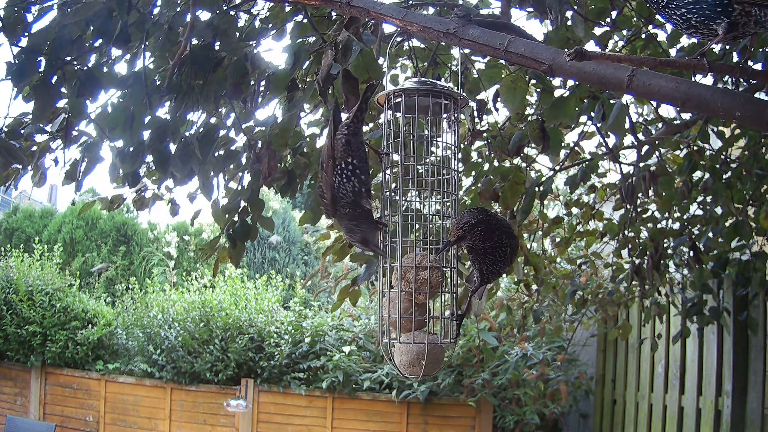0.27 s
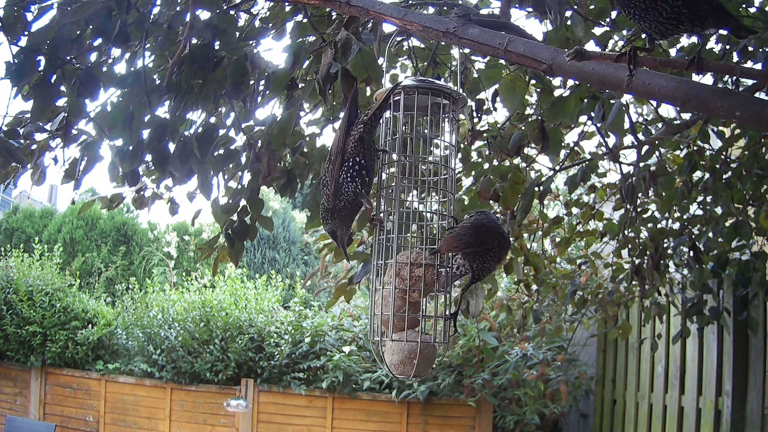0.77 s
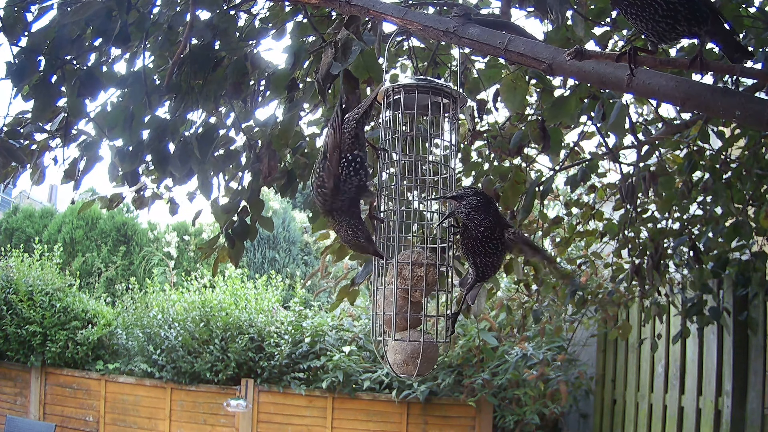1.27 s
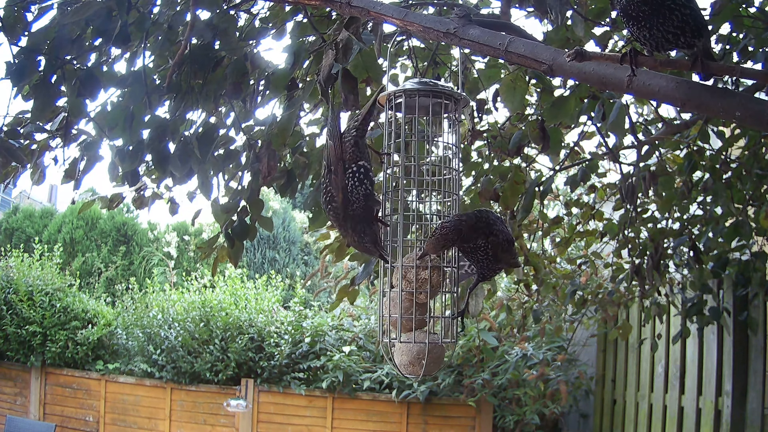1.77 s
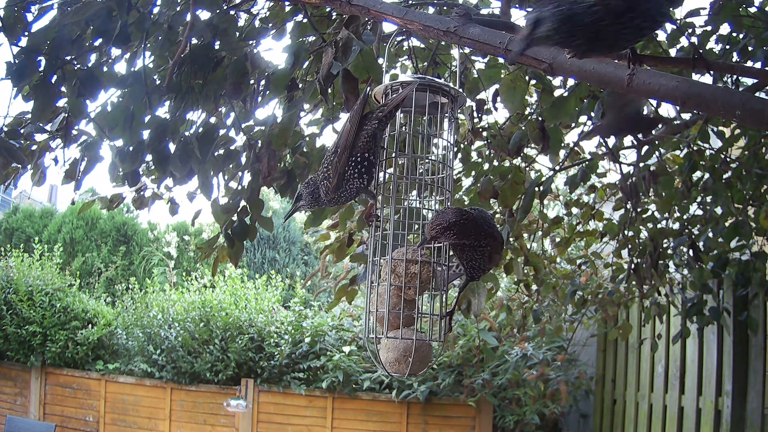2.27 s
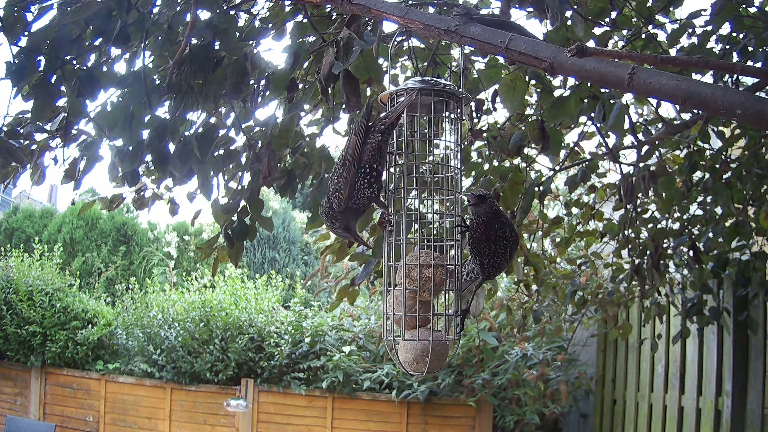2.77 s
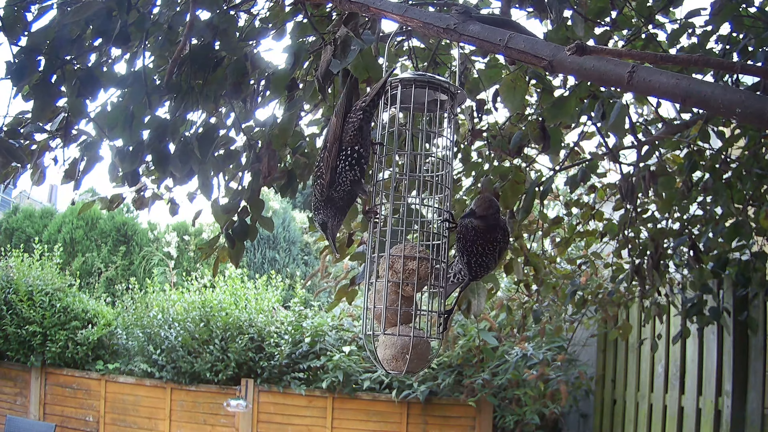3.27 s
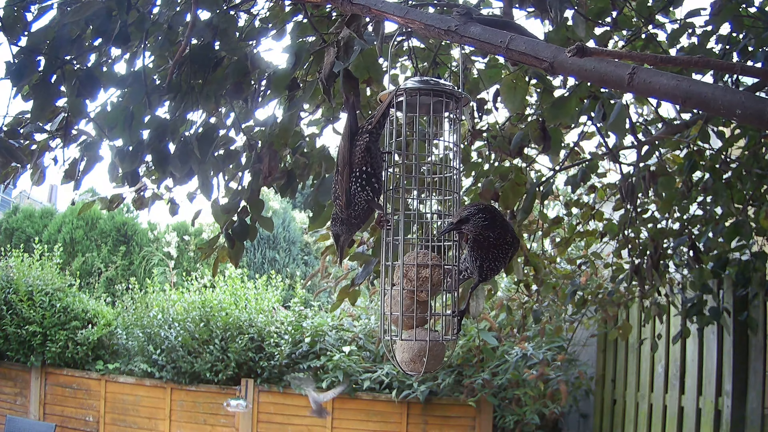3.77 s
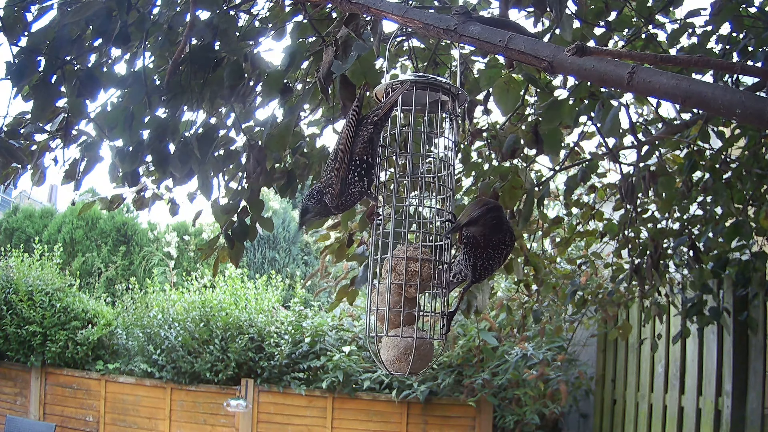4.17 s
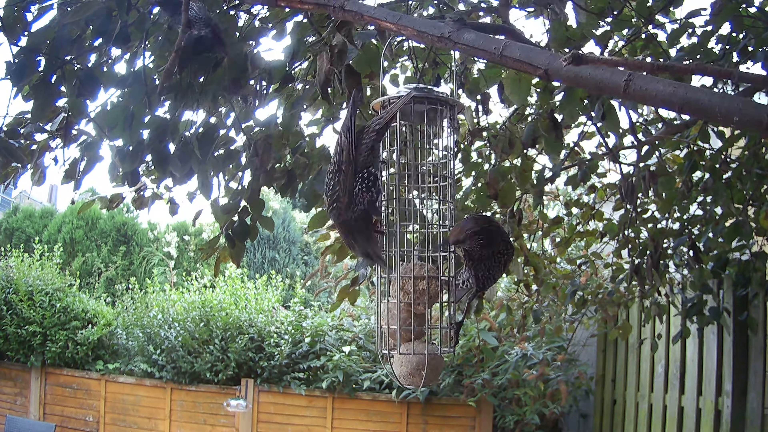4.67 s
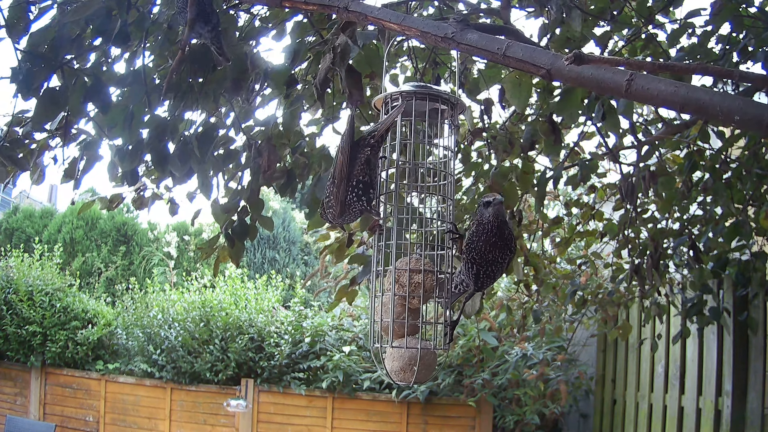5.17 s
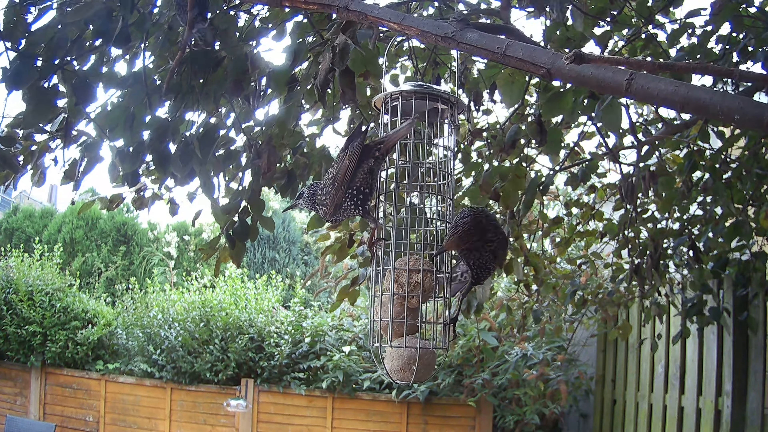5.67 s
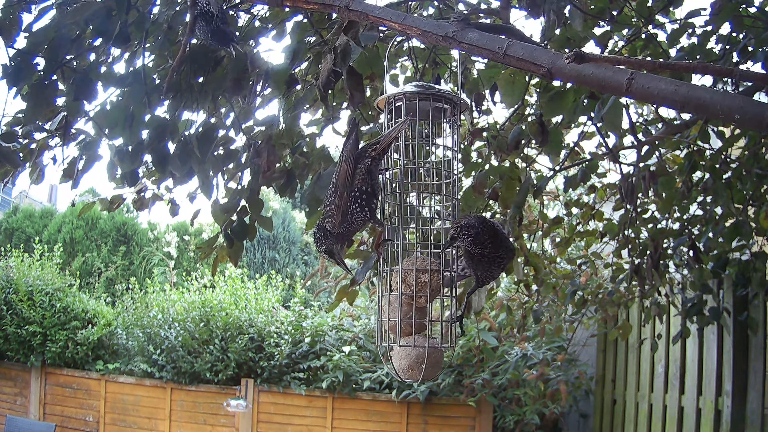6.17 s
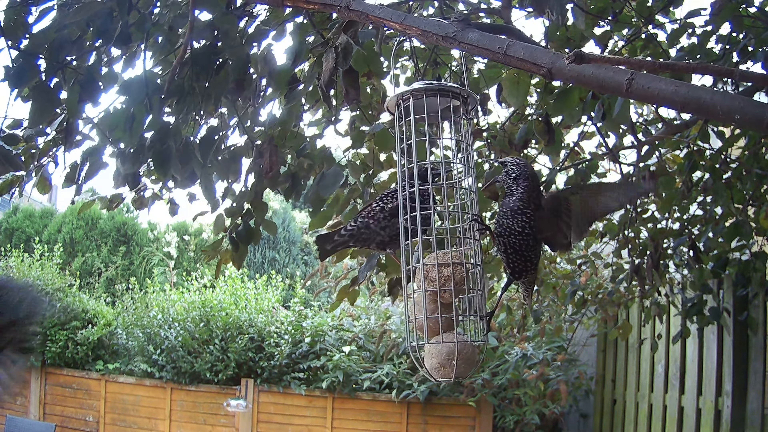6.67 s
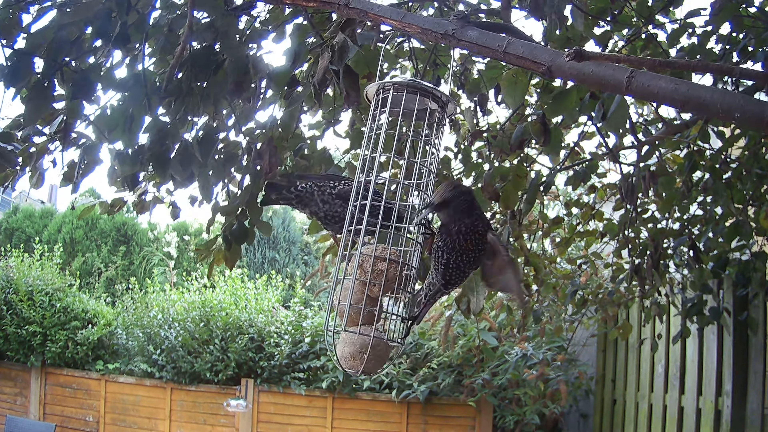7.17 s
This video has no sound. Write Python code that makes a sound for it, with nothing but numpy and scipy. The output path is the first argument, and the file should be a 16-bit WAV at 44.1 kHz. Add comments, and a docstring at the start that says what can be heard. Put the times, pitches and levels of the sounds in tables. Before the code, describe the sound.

A close outdoor microphone hears starlings at a wire feeder over uneven hiss, faint hum and crackling leaves and claws. A bright trilled squawk starts immediately, with a tick on the cage. From 0.5 to 1.0 seconds come rapid scratchy squawks and knocks, then piercing whistled screams until about 1.5, some tumbling downward in steps. It quietens, with faint distant squawks near 1.8 and 2.4. Soft wingbeats flutter from 2.5 to 3.2, followed by hollow knocks, light pecks and rustling. A distant squawk comes at 4.0 and a weak falling whistle at 4.3. Lower raspy squawks mutter from 5.1 to 5.6. Around 6.1 the quarrel erupts: harsh rapid squawks, a strong burst of scratching near 6.3, flapping wings and shrill screams lasting to about 7.1. A low squawk, a sharp cage tick and a last clipped cry end it. Short garden reflections trail the calls.

```python
"""Starlings squabbling at a wire feeder

Each side of a bird's syrinx is one oscillator: thin whistling screams that tumble down in steps, softer
undertones, and trilled squawks that break into rasp; more squawks and faint tones come from further off.
Noise bursts tick on the cage as beaks and claws, wings flap, and soft hollow knocks ring in low resonances.
Fences echo the birds over a broadband hiss that rises and falls, a low electrical hum and crackle."""
import sys
import numpy as np
from scipy import signal
from scipy.fft import rfft, irfft, next_fast_len
from scipy.io import wavfile
from scipy.ndimage import uniform_filter1d, minimum_filter1d, map_coordinates

SR = 44100
rng = np.random.default_rng(int(sys.argv[2]) if len(sys.argv) > 2 else 0)


def transcribe(signal):
    """Save signal, clipped to [-1, 1], as a 16-bit WAV file at the path in sys.argv[1]."""
    frames = np.atleast_2d(signal).T
    limited = np.clip(frames, -1, 1)
    pcm = np.round(limited * 32767).astype(np.int16)
    wavfile.write(sys.argv[1], SR, pcm)


N = 327663
TIME = np.arange(N) / SR

# air hiss spectrum of a raspy voice: f/Hz, relative level/dB
RASP_SPECTRUM = [(500, -24.5), (1200, -14), (2500, -11), (4000, -2), (6300, -1), (9000, -10.5),
                 (10300, -16.5), (15000, -21)]
# spectrum of brushing feathers and scratching claws: f/Hz, relative level/dB
SCRATCH_SPECTRUM = [(600, -12), (1800, -1.5), (4500, 4), (8000, -2), (11000, -2), (15000, 3)]

ARCH_BEND = 1.7  # exponent of a note's pitch arch


def undb(db):
    """Decibels to gain."""
    return 10 ** (np.asarray(db) / 20)


def unit(x):
    """Scale to rms 1."""
    return x / np.sqrt(np.mean(x ** 2) + 1e-18)


def colour(x, points):
    """Filter by a spectrum of (f/Hz, gain/dB) points, interpolated over log frequency."""
    hz, db = np.transpose(points)
    size = next_fast_len(len(x))
    f = np.maximum(np.fft.rfftfreq(size, 1 / SR), 1)
    gain = undb(np.interp(np.log(f), np.log(hz), db))
    return irfft(rfft(x, size) * gain, size)[:len(x)]


def noise(size, points):
    """Noise of a given colour, rms 1."""
    return unit(colour(rng.standard_normal(size), points))


def wander(t, rate_hz):
    """Smooth random curve through rate_hz normal draws (spread 1) a second."""
    steps = (t - t[0]) * rate_hz
    return map_coordinates(rng.standard_normal(2 ** 15), [steps], order=3, mode="mirror")


def breakpoints(points):
    """Level over the scene from (t/s, level/dB) points, in dB."""
    return np.interp(TIME, *np.transpose(points))


def add(out, start_s, x):
    """Mix x into out from a start time."""
    i = int(start_s * SR)
    out[i:i + len(x)] += x[:max(N - i, 0)]


def ringing(pulses, decay_s):
    """Give every pulse an exponential decay."""
    return signal.lfilter([1], [1, -np.exp(-1 / (decay_s * SR))], pulses)


def swells(table):
    """Sum of bell-shaped envelopes: centre/s, level/dB, standard deviation/s."""
    return sum(undb(db) * np.exp(-((TIME - s) / width_s) ** 2 / 2) for s, db, width_s in table)


def membrane(hz, second_db, third_db):
    """Oscillator: nearly a sine, with second and third harmonics muted above Nyquist."""
    phase = 2 * np.pi * np.cumsum(hz) / SR
    wave = np.sin(phase)
    for k, db in ((2, second_db), (3, third_db)):
        wave = wave + undb(db) * np.sin(k * phase) * (k * hz < SR / 2)
    return np.sqrt(2) * wave


def span(length_s, edge_s=.002):
    """Time axis and soft on-off gate of one note."""
    t = np.arange(0, length_s, 1 / SR)
    edge = np.clip(np.minimum(t, t[-1] - t) / edge_s, 0, 1)
    return t, np.sin(np.pi / 2 * edge) ** 2


def note(start_s, length_s, first_hz, top_hz, top_s, last_hz, db, attack_s, fade_db, fall_bend=ARCH_BEND):
    """The pitch bends to its turning point and away; the level swells in the attack, then fades."""
    onset_db, fade_bend = 14, 1.8
    t, gate = span(length_s)
    before = np.clip(1 - t / top_s, 0, 1)
    after = np.clip((t - top_s) / max(length_s - top_s, .001), 0, 1)
    hz = top_hz + (first_hz - top_hz) * before ** ARCH_BEND + (last_hz - top_hz) * after ** fall_bend
    swell = np.clip(1 - t / attack_s, 0, 1)
    fade = np.clip((t - attack_s) / max(length_s - attack_s, .001), 0, 1)
    return t, hz, gate * undb(db - onset_db * swell - fade_db * fade ** fade_bend)


def background():
    """Broadband hiss that rises and falls, a low wavering electrical hum, and crackle of claws and leaves."""
    # hiss spectrum: f/Hz, relative level/dB
    background_spectrum = [(15, -31.5), (25, 3), (81, -5.5), (207, -9), (278, -7), (373, -12.5), (529, -10),
                           (588, -14.5), (691, -14), (1120, -15.5), (2300, -25.5), (3010, -24.5),
                           (6720, -27), (15000, -41)]
    # hiss: t/s, relative level/dB
    background_levels = [(0.0, -51), (0.43, -61.5), (0.95, -52.5), (1.43, -53.5), (1.68, -63), (2.44, -68),
                         (2.73, -59), (4.61, -59.5), (5.09, -65), (5.36, -53), (6.04, -64.5), (6.27, -51),
                         (6.95, -49.5), (7.43, -56.5)]
    # electrical hum: t/s, level/dB
    mains_levels = [(0, -66), (2, -63), (4.3, -57), (4.7, -51.5), (7.43, -54.5)]
    # scratching of claws and leaves: t/s, level/dB
    rustle_levels = [(0, -52.5), (1.7, -69), (2.3, -60.5), (2.7, -55.5), (3.3, -53), (3.85, -50),
                     (4.1, -64.5), (4.6, -48), (5.1, -69.5), (5.8, -61.5), (6.3, -28), (7.43, -55)]
    hiss_gain_db, mains_hz = 8, 59
    grains_per_s, grain_spread_db, grain_decay_s = 160, 8, .0088

    hiss_db = breakpoints(background_levels) + hiss_gain_db + 1.4 * wander(TIME, 6.8)
    hiss = noise(N, background_spectrum) * undb(hiss_db)

    mains_db = breakpoints(mains_levels) + 1.4 * wander(TIME, 10)
    mains = membrane(mains_hz * (1 + .048 * wander(TIME, 4.3)), -18.5, -17) * undb(mains_db)

    grain_gain = undb(grain_spread_db * np.clip(rng.standard_normal(N), -2, 2))
    grains = (rng.random(N) < grains_per_s / SR) * grain_gain
    bursts = unit(ringing(grains, grain_decay_s))
    # the constant keeps a steady scratch under the bursts
    crackle = unit(colour((bursts + .71) * rng.standard_normal(N), SCRATCH_SPECTRUM))
    return hiss + mains + crackle * undb(breakpoints(rustle_levels))


def trill(t, rate_hz):
    """Uneven trill: its phase and its swing, a slow rise and a quick fall of varying reach."""
    phase = 2 * np.pi * np.cumsum(rate_hz * np.exp(.24 * wander(t, 90))) / SR
    swing = (np.sin(phase) - .18 * np.sin(2 * phase)) * (1 + .3 * wander(t, 130))
    return phase, swing


def squawks(table, second_db, hiss_db, chaos_hz):
    """A fast trill swings the pitch; with rasp the membrane turns chaotic, the other side joins, air hisses."""
    jag_hz, side_ratio, tract_hz = 340, .67, 6500
    effort_hz, effort_db, effort_pitch = 45, .97, .02  # uneven push: rate, spread of level, share of pitch
    hiss_rise = .37  # hiss grows with pitch to this power
    out = np.zeros(N)
    for *shape, trill_hz, depth_hz, first_rasp, last_rasp in table:
        t, hz, level = note(*shape)
        effort = wander(t, effort_hz)
        hz = hz * (1 + effort_pitch * effort)
        _, gate = span(shape[1], edge_s=.0039)
        level = level * undb(effort_db * effort) * gate

        rasp = np.linspace(first_rasp, last_rasp, len(t)) * np.exp(.3 * wander(t, 60))
        rasp = np.clip(rasp, 0, 1)
        # mild rasp only makes the pitch jagged; strong rasp tears it apart
        upper_shake, lower_shake = [
            jag_hz * np.sqrt(rasp) * wander(t, 350) + chaos_hz * rasp ** 2 * wander(t, 1800)
            for _ in range(2)]

        phase, upper_swing = trill(t, trill_hz)
        _, lower_swing = trill(t, trill_hz)
        # the throat lifts the second harmonic as it passes the resonance
        lift_db = 11 * np.exp(-((2 * hz - tract_hz) / 1200) ** 2)
        upper = membrane(hz + depth_hz * upper_swing + upper_shake, second_db + lift_db, -34.5)
        lower = membrane(side_ratio * (hz + depth_hz * lower_swing + lower_shake), -5.5, -28)
        # the tone dips on each quick fall of the trill
        throb = 1 - np.clip(depth_hz / 800, 0, .9) * np.cos(phase - 3)

        side = .75 * rasp
        hiss = undb(hiss_db) * rasp ** 1.3 * (np.abs(hz) / tract_hz) ** hiss_rise
        air = hiss * noise(len(t), RASP_SPECTRUM) * undb(2 * wander(t, 400))
        voice = throb * (upper + side * lower) + air
        add(out, shape[0], level * voice / np.sqrt(1 + side ** 2 + hiss ** 2))
    return out


def near_squawks():
    """Trilled squawks at the feeder, each with its own pitch arch and rasp."""
    # squawks: start/s, length/s, first f/Hz, top f/Hz, top after/s, last f/Hz, level/dB, attack/s, fade/dB,
    # mean trill rate/Hz, trill depth/Hz, rasp at start/0-1, rasp at end/0-1
    squawk_notes = [ (0, 0.084, 6660, 5815, 0.031, 6075, -7, 0.00059, 5, 152.8, 456, 0.07, 0.07),
                    (.52, .08, 1925, 2529, .04, 2990, -31.5, 0.03, 1.5, 74.2, 370, 0.38, .1),
                    (.598, 0.082, 3406, 3330, .03, 3355, -30.5, 0.0028, 4, 71.4, 610, 0.44, 0.21),
                    (.677, 0.052, 6080, 5890, 0.017, 6820, -21.5, 0.0064, -2, 61.3, 37, .02, 0.19),
                    (.731, 0.063, 4000, 3070, 0.027, 3370, -17.5, .024, 12, 89.9, 266, 0.05, 0.24),
                    (.792, 0.089, 3450, 3550, 0.014, 3564, -22, .006, 9, 89.8, 460, 0.19, 0.34),
                    (.875, 0.072, 5380, 6050, .012, 5870, -14, 0.017, 13.5, 57, 34, 0.03, 0.66),
                    (.945, 0.08, 3750, 2984, 0.046, 3100, -22, 0.0024, 14, 87.3, 270, 0.06, 0.24),
                    (5.105, 0.13, 1400, 2532, 0.054, 2550, -30, .04, 4, 70.14, 385, .1, 0.15),
                    (5.265, 0.021, 4250, 5670, 0.015, 5560, -26.5, 0.0085, 12.5, 59.9, 5, 0.23, 0.13),
                    (5.31, 0.1, 2730, 3310, 0.035, 3420, -33.5, 0.015, 1, 62.3, 210, 0.44, 0.1),
                    (5.395, 0.13, 2180, 3140, 0.044, 3230, -26, 0.025, 6, 62.7, 385, 0.36, 0.21),
                    (5.481, 0.12, 2900, 3100, 0.059, 3260, -26, .012, 3.5, 61.9, 410, 0.51, 0.08),
                    (6.084, 0.056, 4940, 6340, 0.016, 5200, -25.5, 0.0041, -5, 62, 34, 0, 0.08),
                    (6.15, 0.041, 5790, 5550, .006, 2990, -21, 0.0049, -0.5, 69.1, 230, 0.67, 0.7),
                    (6.189, 0.053, 3090, 3746, .031, 3510, -12, 0.0076, 14, 67.6, 103, .03, 0.3),
                    (6.233, 0.078, 3420, 4680, .023, 3290, -16, 0.0034, 4.5, 70.3, 120, .42, .28),
                    (6.311, .055, 4494, 6950, 0.016, 3370, -9.5, 0.0057, 15, 64, 81, .05, .85),
                    (6.411, .11, 5300, 6850, 0.045, 6400, -7.5, 0.062, 2, 101, 57, .1, 0.13),
                    (6.52, 0.088, 6340, 6340, 0.0094, 4664, -15.5, .001, -8, 99.6, 400, 0.09, 0.03),
                    (6.948, 0.16, 1521, 2598, .11, 2473, -25, 0.015, 4.5, 54, 350, .45, 0.17),
                    (7.364, 0.026, 2300, 2446, .008, 4510, -42, .006, -12, 60, 20, 0.35, 0.33),
                    (7.39, .043, 4700, 6160, .012, 3680, -19.5, 0.015, 8, 61.8, 170, 0.15, 0.75), ]
    return squawks(squawk_notes, second_db=-25, hiss_db=3.5, chaos_hz=964)


def glides(table, jitter, jitter_hz, flutter_db, overtone_db, edge_s, fade_db):
    """Soft wavering oscillators that slide from one pitch to another as they fade."""
    out = np.zeros(N)
    for start_s, length_s, first_hz, last_hz, db in table:
        t, gate = span(length_s, edge_s)
        share = t / length_s
        hz = first_hz * (last_hz / first_hz) ** share
        tone = membrane(hz * (1 + jitter * wander(t, jitter_hz)), overtone_db, overtone_db - 5.5)
        level_db = db - fade_db * (share - .5) + flutter_db * wander(t, jitter_hz / 2)
        add(out, start_s, gate * undb(level_db) * tone)
    return out


def undertones():
    """Softer gliding tones from the other side of the syrinx."""
    # start/s, length/s, first f/Hz, last f/Hz, mid-length level/dB
    undertone_notes = [ (0, 0.042, 3350, 2990, -29.5), (.035, 0.086, 1400, 2910, -35.5),
                       (.034, 0.098, 3790, 3400, -42.5), (.888, 0.0287, 2830, 1363, -35),
                       (1.02, 0.0178, 5810, 5350, -37), (1.043, .072, 4948, 4200, -30),
                       (1.21, 0.043, 2750, 1645, -34), (1.365, .085, 5350, 4350, -28),
                       (4.35, .055, 5140, 3300, -49), (5.582, .024, 2100, 942, -37),
                       (6.192, 0.086, 1543, 3000, -26), (6.272, 0.036, 5807, 4620, -23.5),
                       (6.296, 0.017, 1825, 1710, -27.5), (6.312, 0.016, 2940, 2250, -24),
                       (6.325, .042, 1707, 892, -43.5), (6.428, 0.043, 5750, 4620, -21),
                       (7.095, 0.027, 5050, 5350, -30), (7.391, 0.044, 3100, 1050, -35), ]
    return glides(undertone_notes, jitter=.028, jitter_hz=170, flutter_db=2,
                  overtone_db=-16.5, edge_s=.003, fade_db=3)


def far_tones():
    """Faint, slowly edged tones from far away."""
    # start/s, length/s, first f/Hz, last f/Hz, mid-length level/dB
    far_notes = [(.6, 1.55, 266, 261, -63), (.05, .9, 490, 520, -64), (1.05, 0.63, 525, 495, -58.5),
                 (2.48, .47, 535, 500, -63), (5.14, 0.29, 547, 534, -58), (5.45, 0.43, 492, 454, -55.5)]
    return glides(far_notes, jitter=.028, jitter_hz=45, flutter_db=3,
                  overtone_db=-25.5, edge_s=.081, fade_db=9)


def light_pecks():
    """Faint strikes at random moments while the birds feed."""
    first_s, last_s = (1.9, 6.6)
    pecks_per_s, knock_db, tick_db, scatter_db = 3.5, -64.5, -59, 9
    chance = rng.random((int((last_s - first_s) * pecks_per_s), 3))
    return [(first_s + when * (last_s - first_s),
             knock_db + scatter_db * (2 * low - 1),
             tick_db + scatter_db * (2 * high - 1)) for when, low, high in chance]


def pecks():
    """Each beak or claw strike is decaying noise: a hard crack at contact, a dull knock and a bright tick."""
    # loud strikes on the cage: t/s, relative level of low knock/dB, relative level of bright tick/dB
    strikes = [(.125, -40, -27.5), (.275, -53, -45.5), (.599, -41, -32), (0.667, -42, -30),
               (.803, -29.5, -42), (0.868, -32.5, -33), (1.013, -31, -29), (1.116, -37, -17),
               (1.768, -72, -55.5), (3.567, -43.5, -31), (3.64, -46, -49), (3.809, -49, -45.5),
               (3.835, -43.5, -42.5), (5.956, -43, -48.5), (6.02, -43.5, -35.5), (6.078, -48.5, -32.5),
               (6.236, -42, -29), (7.123, -35.5, -22.5), (7.276, -46.5, -56)]
    # knock spectrum: f/Hz, relative level/dB
    knock_spectrum = [(150, -19), (500, -7), (1600, 1.5), (3000, -1.5), (5000, -17)]
    # tick spectrum: f/Hz, relative level/dB
    tick_spectrum = [(1800, -23.5), (3600, 5), (5500, -1.5), (7500, -2), (11000, -20.5), (15000, -12)]
    knock_t60_s, tick_t60_s, gain_db = .071, .012, 1
    crack_db, crack_s = 9, .00066
    out, t = np.zeros(N), np.arange(4096) / SR
    contact = 1 + undb(crack_db) * np.exp(-t / crack_s)
    for s, low_db, high_db in strikes + light_pecks():
        knock = undb(low_db + gain_db - 60 * t / knock_t60_s) * noise(len(t), knock_spectrum)
        tick = undb(high_db + gain_db - 60 * t / tick_t60_s) * noise(len(t), tick_spectrum)
        add(out, s + .001, contact * (knock + tick))
    return out


def tumble(start_s, length_s, first_hz, last_hz, db, fade_db):
    """The pitch drifts, then slips, in ever smaller steps; the level restarts loud on each step."""
    step_s, slide_share, step_dip_db, bend = .018, .25, 4, .85
    t, gate = span(length_s)
    step, within = np.divmod(t / step_s, 1)
    slip = np.clip((within - 1) / slide_share + 1, 0, 1)
    stairs = step + .75 * slip + .25 * within
    hz = first_hz * (last_hz / first_hz) ** (stairs / stairs[-1]) ** bend
    return t, hz, gate * undb(db - step_dip_db * within - fade_db * (t / length_s) ** 2)


def screams():
    """Taut membranes whistle; slack ones shake and gain overtones. Faint rapid ticks sound over the high,
    steady whistles."""
    # one row per sounding syrinx side: start/s, length/s, first f/Hz, top f/Hz, top after/s, last f/Hz,
    # level/dB, attack/s, fade/dB, exponent of pitch fall, nominal tick rate/Hz
    scream_notes = [ (1.032, 0.085, 7600, 8360, .042, 7400, -13.5, .02, 3, 1.9, 100.2),
                    (1.12, 0.31, 7930, 8880, 0.13, 8490, -10, .09, 9.5, 2.2, 73.86),
                    (1.351, .105, 8260, 8430, .012, 7350, -11.5, .002, 15, 2.6, 133.2),
                    (4.3, 0.092, 8400, 8450, .022, 7100, -32.5, 0.0012, 5.5, 2.2, 101),
                    (6.403, 0.097, 7700, 8460, 0.02, 7400, -15.5, 0.0031, 0.5, 3.2, 101),
                    (6.612, 0.31, 8290, 9100, .1, 8000, -10.5, 0.11, 2.5, 1.25, 118.3),
                    (6.87, 0.13, 7720, 7906, 0.034, 7102, -15, 0.016, -8, 1.3, 132.4),
                    (6.987, .116, 7080, 7140, 0.045, 6900, -11.5, .001, 7.5, 1.26, 104), ]
    # stepped ends: start/s, length/s, first f/Hz, last f/Hz, level/dB, fade/dB
    tumble_notes = [(1.107, .057, 7100, 4065, -9.5, 9), (1.457, .064, 6325, 4146, -8, 11.5),
                    (4.387, .097, 5815, 3040, -21, 5), (6.492, 0.024, 6350, 4680, -0.5, 14)]
    # rapid ticks: f/Hz, relative level/dB
    tick_train_spectrum = [(1500, -28), (2400, -15), (2950, -3.5), (3800, -11.5), (4800, 2), (5700, -7.5),
                           (7000, -7), (9000, -8), (14000, -25.5)]
    slack_hz, tight_jitter, slack_jitter, settling_jitter = 7400, .0025, .015, .011
    shimmer_db, settling_s = 2.1, .056
    tick_train_db, tumble_ticks_hz, tick_scatter = -21, 105, .09

    notes = [(row[0], ticks_hz, *note(*row)) for *row, ticks_hz in scream_notes]
    notes += [(row[0], tumble_ticks_hz, *tumble(*row)) for row in tumble_notes]
    out = np.zeros(N)
    for start_s, ticks_hz, t, hz, level in notes:
        slack = np.clip((slack_hz - hz) / 2000 + .3, 0, 1)
        # the whistle is unsteady until it settles, as the ticks grow in
        settling = np.exp(-t / settling_s)
        jitter = tight_jitter + slack_jitter * slack + settling_jitter * settling
        hz = hz * (1 + jitter * wander(t, 450))
        tone = membrane(hz, -32 + 13 * slack, -35) * undb(shimmer_db * wander(t, 110))

        cycles = np.floor(np.cumsum(ticks_hz * np.exp(tick_scatter * wander(t, 25))) / SR)
        # every tick is a brief decaying burst of noise
        bursts = ringing(np.diff(cycles, prepend=0), .00055)
        tick_train = unit(colour(bursts * rng.standard_normal(len(t)), tick_train_spectrum))
        tick_train = tick_train * (1 - settling) * (1 - slack)

        hiss = undb(-38 + 14 * slack) * noise(len(t), RASP_SPECTRUM)
        add(out, start_s, level * (tone + undb(tick_train_db) * tick_train + hiss))
    return out


def far_squawks():
    """Birds further off all give the same kind of rising, trilled squawk."""
    # start/s, length/s, first f/Hz, top f/Hz, level/dB
    far_calls = [(1.8, .15, 1600, 2967, -57), (2.421, 0.16, 1601, 2276, -55),
                 (3.989, 0.17, 2196, 2475, -42), (4.905, .16, 2114, 2400, -50)]
    top_share, attack_s, fade_db = .94, .05, 2
    trill_hz, depth_hz, rasp = 64, 340, .282
    table = [(start_s, length_s, first_hz, top_hz, top_share * length_s, top_hz, db,
              attack_s, fade_db, trill_hz, depth_hz, rasp, rasp)
             for start_s, length_s, first_hz, top_hz, db in far_calls]
    return squawks(table, second_db=-48, hiss_db=-5, chaos_hz=1001)


def strokes():
    """Wings beat at a steady rate through each bout: centre/s, level/dB, standard deviation/s."""
    # bouts of wing strokes: first stroke/s, length/s, relative level/dB
    bouts = [(2.472, .04, -37), (2.63, .56, -42.5), (6.24, .04, -43), (6.39, .13, -45.5), (6.58, .22, -42),
             (6.87, .04, -42.5)]
    wingbeat_hz, stroke_s = 11.9, .02
    return [(start_s + s, db, stroke_s) for start_s, length_s, db in bouts
            for s in np.arange(0, length_s, 1 / wingbeat_hz)]


def wings():
    """Each stroke pushes a pressure wave and a puff of air, and brushes the feathers together."""
    # puff spectrum: f/Hz, relative level/dB
    puff_spectrum = [(20, 7.5), (45, -4), (90, -19), (280, -20), (700, -51), (3000, -56.5)]
    puff_db, push_db, feather_db, push_hz = 1, -2, -16, 38
    puff = noise(N, puff_spectrum)
    push = membrane(push_hz * (1 + .19 * wander(TIME, 30)), -15, -8)
    feathers = noise(N, SCRATCH_SPECTRUM) * undb(5.6 * wander(TIME, 300))
    return swells(strokes()) * (undb(puff_db) * puff + undb(push_db) * push + undb(feather_db) * feathers)


def hollow():
    """Soft knocks of noise in a few low resonances, with short falling hums after runs of them."""
    # knocks: centre/s, level/dB, standard deviation/s
    knock_swells = [(3.25, -45, .008), (3.312, -44.5, 0.0069), (3.385, -39.5, 0.0065), (3.46, -43, 0.0076),
                    (3.645, -44.5, 0.0088), (3.816, -36, 0.0035), (4.215, -49.5, .008),
                    (4.27, -45.5, 0.0066), (4.356, -42.5, 0.0075), (4.54, -42.5, 0.061),
                    (6.645, -35, 0.0057), (6.718, -30, 0.0096), (6.92, -40, 0.048)]
    # resonances: f/Hz, width/Hz, relative level/dB
    modes = [(308.5, 133, 0), (457, 250, -6), (704, 67, -5.5), (953, 280, -9)]
    # hums: start/s, length/s, first f/Hz, last f/Hz, mid-length level/dB
    hum_notes = [(3.555, 0.12, 323.5, 283, -47), (4.485, 0.11, 348, 289, -41),
                 (6.872, 0.111, 327, 292, -40)]
    f = np.fft.rfftfreq(N, 1 / SR)
    body = sum(undb(db) / (1 + (2 * (f - hz) / width_hz) ** 2) for hz, width_hz, db in modes)
    resonant = unit(irfft(rfft(rng.standard_normal(N)) * body, N))
    hums = glides(hum_notes, jitter=.057, jitter_hz=118.6, flutter_db=2.5,
                  overtone_db=-12, edge_s=.004, fade_db=.5)
    return swells(knock_swells) * resonant + hums


def garden_echo(x):
    """Foliage scatters the sound early; fences and house wall return a short tail, all as decaying noise."""
    t60_s, first_s, early_db, early_s = .27, .0044, 5, .02
    t = np.arange(SR * 3 // 4) / SR
    scatter = rng.standard_normal(len(t)) * undb(3 * wander(t, 250))
    decay = undb(-60 * t / t60_s + early_db * np.exp(-t / early_s))
    response = unit(scatter * decay * (t > first_s)) / np.sqrt(len(t))
    echo = signal.fftconvolve(x, response)[:N]
    return colour(echo, [(300, 3), (2500, 0), (5500, 1), (8500, -4), (14000, -6)])  # f/Hz, gain/dB


def scene():
    """Near birds are mostly dry; far ones carry a larger share of echo."""
    near = near_squawks() + undertones() + pecks() + screams() + wings()
    far = far_squawks()
    echo = garden_echo(undb(-7.5) * near + undb(-3.5) * far)
    return (near + undb(-3) * far + echo + far_tones() + hollow() + background())[None]


def limiter(x, ceiling=.72):
    """Turn the gain down for a few milliseconds around peaks above the ceiling."""
    gain = np.minimum(1, ceiling / (np.abs(x) + 1e-9))
    return x * uniform_filter1d(minimum_filter1d(gain, size=129), size=129)


def record(dry):
    """The microphone's treble falls away; peaks are limited and the top is cut."""
    # microphone response: f/Hz, gain/dB
    response = [(20, -1), (9100, -1.5), (9900, -5), (12000, -12), (15000, -19)]
    top_hz = 15500
    sos = signal.ellip(8, .2, 70, top_hz, fs=SR, output="sos")
    return signal.sosfilt(sos, limiter(colour(dry[0], response)))[None]


dry = scene()
out = record(dry)
transcribe(out)
```